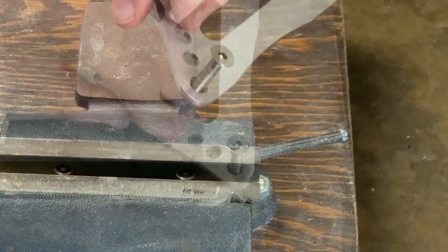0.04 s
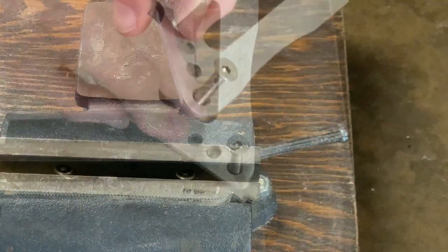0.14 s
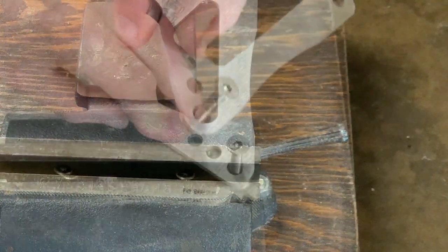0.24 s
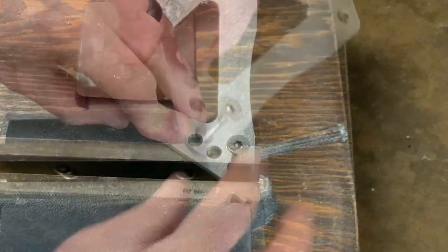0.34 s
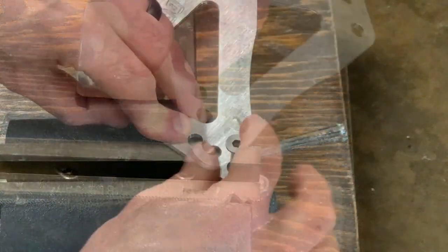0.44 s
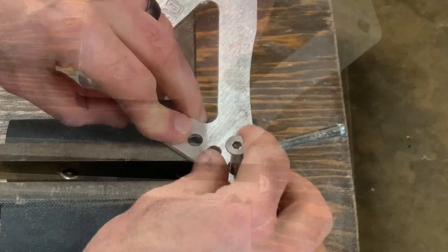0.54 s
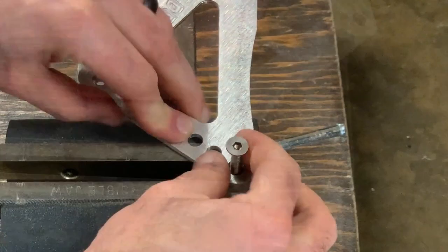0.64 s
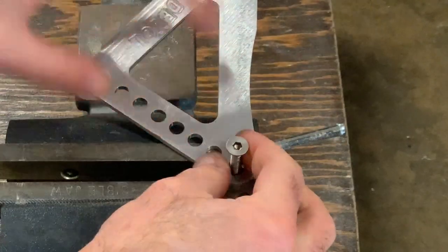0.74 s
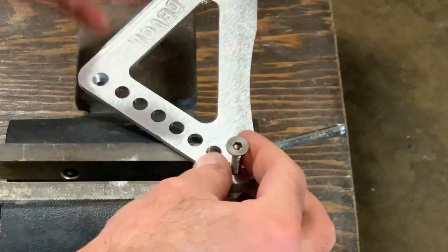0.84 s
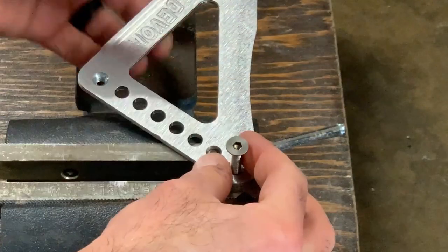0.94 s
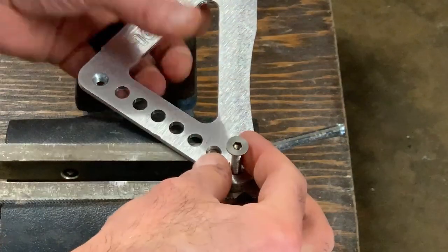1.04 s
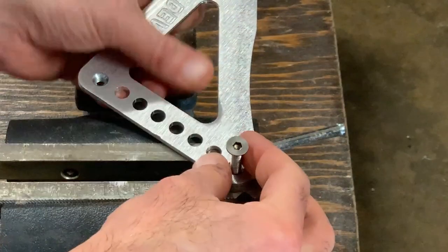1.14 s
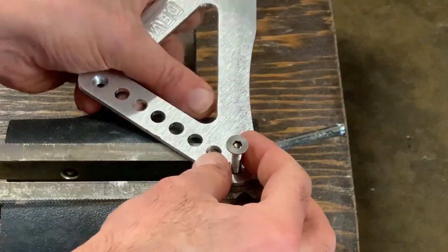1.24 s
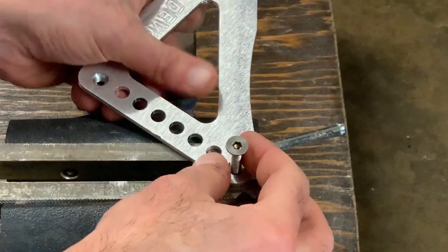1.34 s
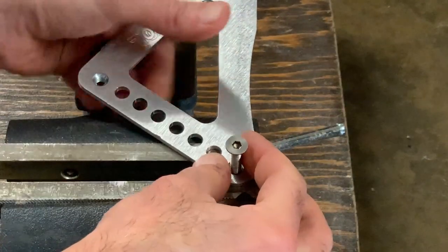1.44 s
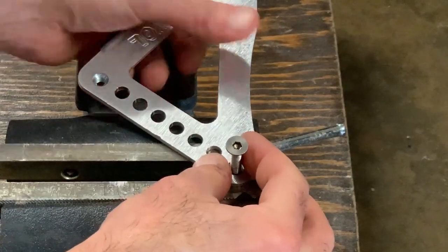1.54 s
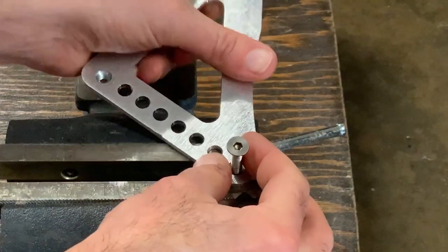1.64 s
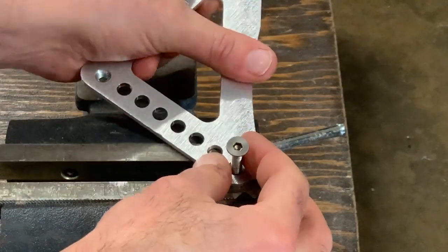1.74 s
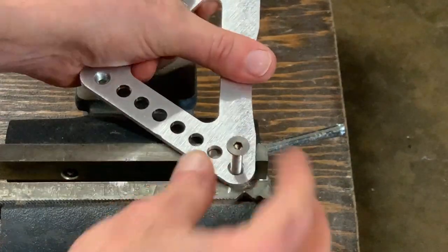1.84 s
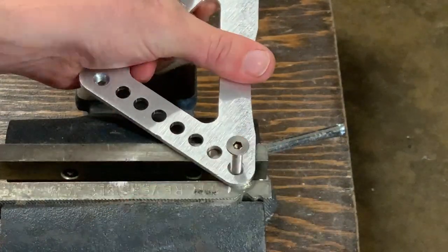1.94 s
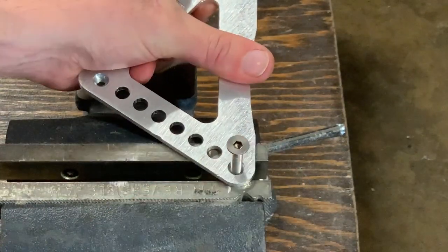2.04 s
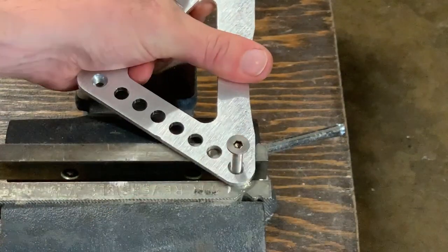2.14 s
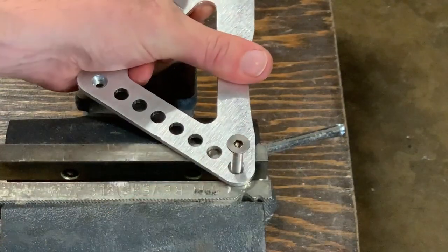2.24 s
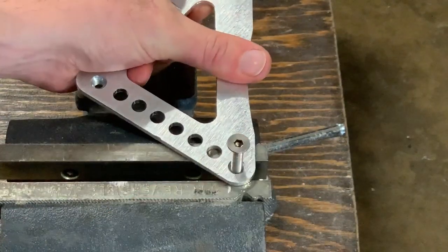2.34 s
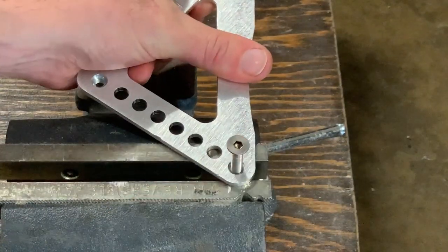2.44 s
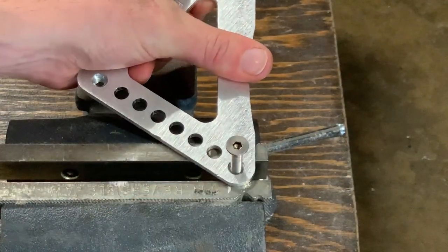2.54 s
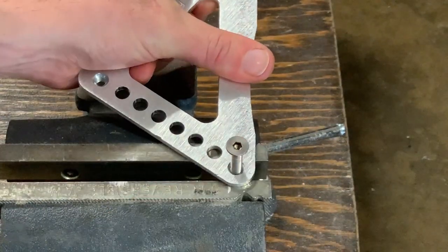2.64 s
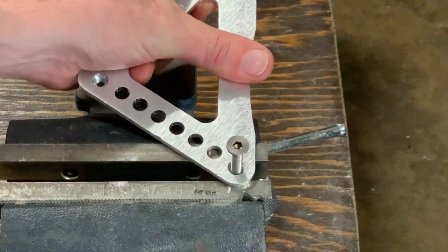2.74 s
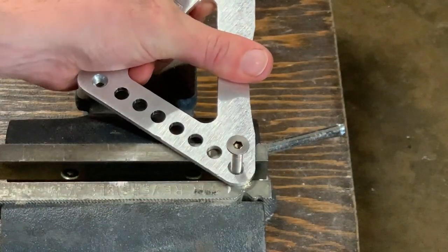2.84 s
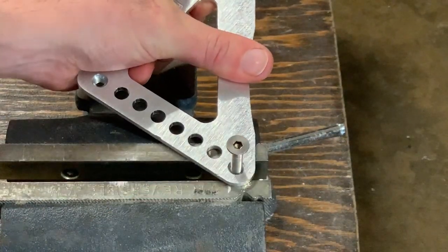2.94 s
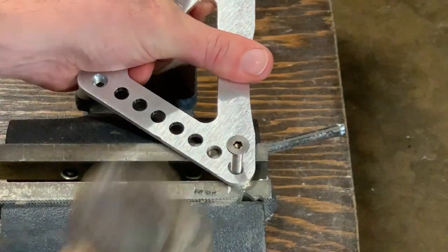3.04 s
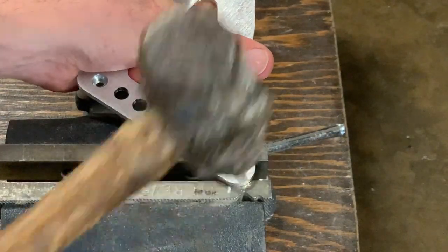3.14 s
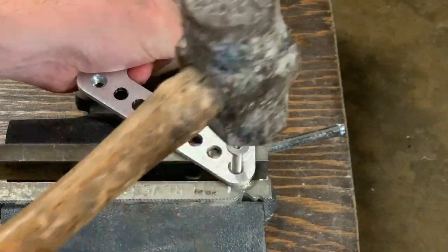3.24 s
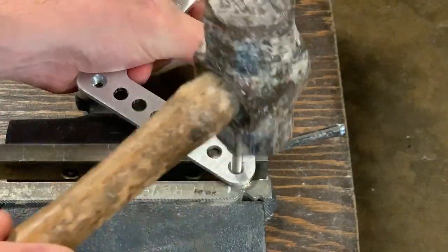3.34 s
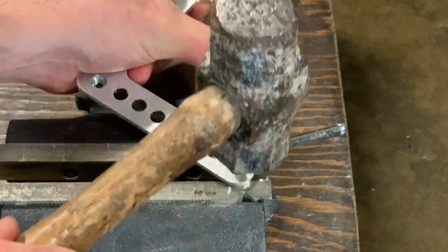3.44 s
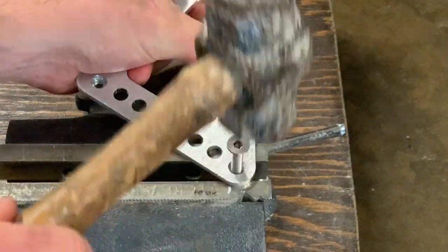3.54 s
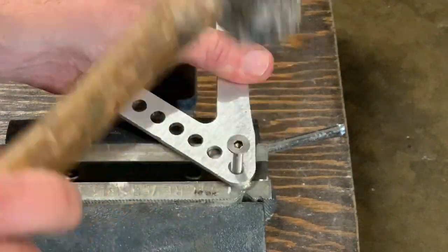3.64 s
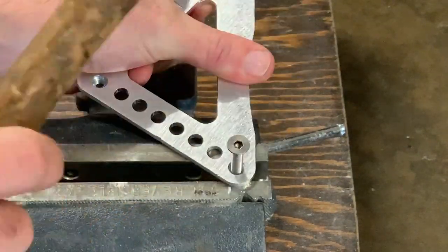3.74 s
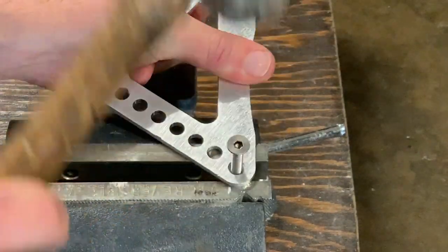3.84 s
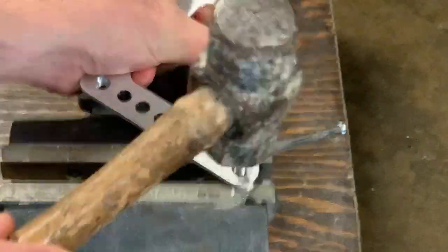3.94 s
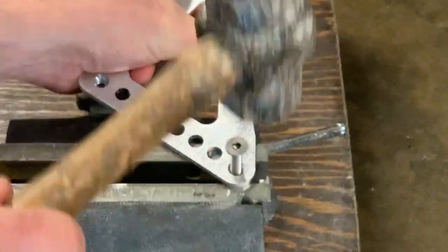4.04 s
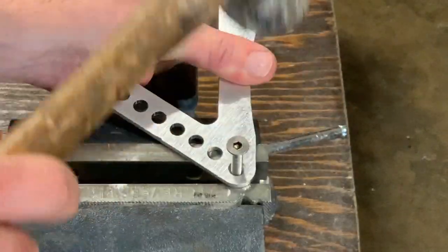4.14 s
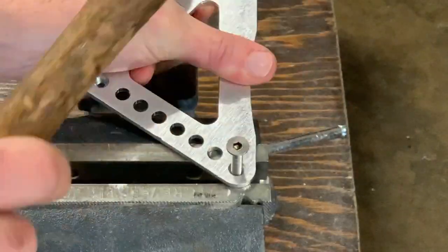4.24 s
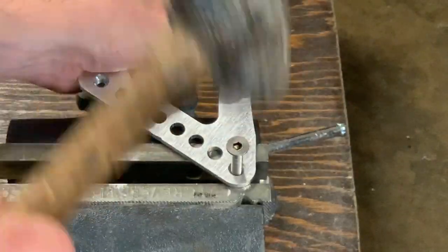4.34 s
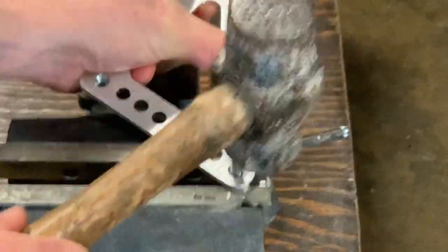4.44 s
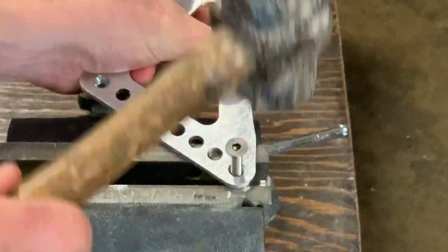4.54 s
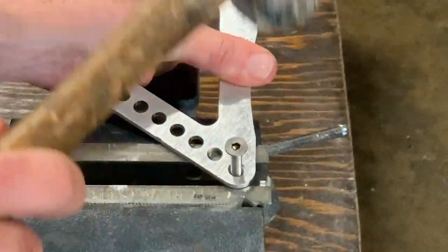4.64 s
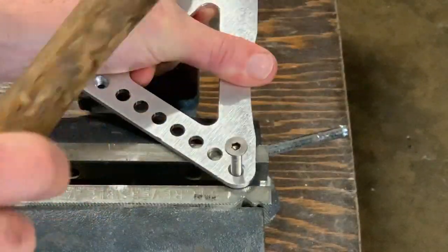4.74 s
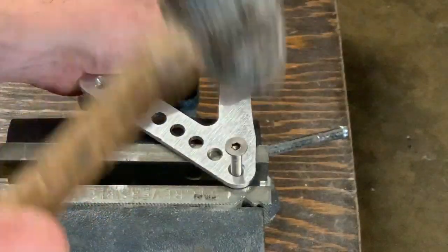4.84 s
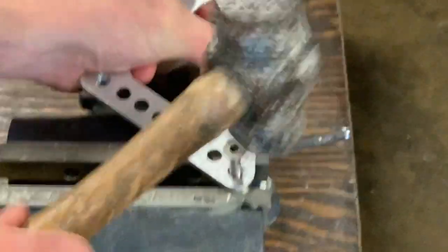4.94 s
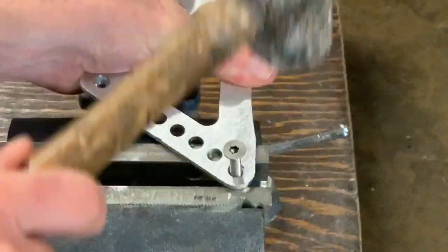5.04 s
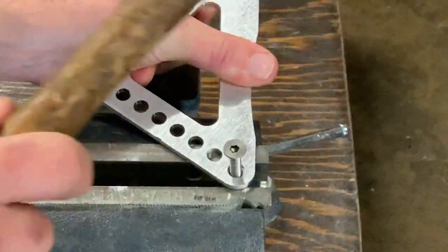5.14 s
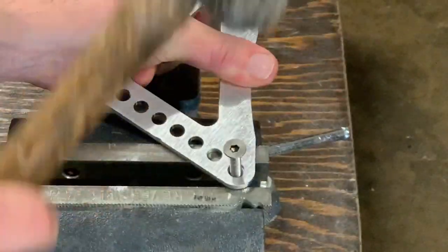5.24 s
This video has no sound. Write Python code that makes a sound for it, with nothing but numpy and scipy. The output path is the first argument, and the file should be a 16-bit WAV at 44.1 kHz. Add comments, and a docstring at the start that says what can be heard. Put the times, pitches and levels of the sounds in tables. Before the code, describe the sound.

Faint metallic clicks and dull wooden knocks in a quiet small workshop, then a light hammer tap and three hard, ringing steel blows.

```python
"""At a workbench in a small, faintly humming workshop, a metal bracket settles on a vise with faint clicks.
A hammer is picked up with dull knocks; one trial tap and three hard blows drive a steel bolt into the bracket.
Each contact is a burst of coloured noise plus decaying modes, low-passed by its hardness, with a diffuse tail.
Under them lie noise floor, hum, an opening hiss, scuffs and thin tones; hard blows overload the microphone."""
import sys
import numpy as np
from scipy import signal
from scipy.fft import rfft, irfft, next_fast_len
from scipy.io import wavfile
from scipy.ndimage import map_coordinates

SR = 44100
rng = np.random.default_rng(int(sys.argv[2]) if len(sys.argv) > 2 else 0)


def inscribe(sig):
    """Save sig as 16-bit PCM at rate SR to the path in sys.argv[1].

    A 1-D sig is mono; a 2-D sig holds one channel per row.
    Samples are clipped to [-1, 1] before scaling.
    """
    pcm = np.round(np.clip(np.atleast_2d(sig).T, -1, 1) * 32767)
    wavfile.write(sys.argv[1], SR, pcm.astype(np.int16))


N = 233015
T = np.arange(int(0.55 * SR)) / SR  # time axis of one contact, s


def amp(db):
    """Decibels to gain."""
    return 10 ** (np.asarray(db) / 20)


def unit(x):
    """Scale to rms 1."""
    return x / np.sqrt(np.mean(x ** 2) + 1e-20)


def along(points, hz):
    """Read (Hz, value) points on a log frequency axis."""
    point_hz, value = np.transpose(points)
    return np.interp(np.log(hz + 1), np.log(point_hz), value)


def fade(t60_s, t=T):
    """Free exponential decay, 60 dB in t60_s."""
    return np.exp(-np.log(1000) * t / t60_s)


def wobble(knots_per_s):
    """A smooth random curve through normally distributed knots."""
    knots = rng.standard_normal(int(N * knots_per_s / SR) + 4)
    return map_coordinates(knots, [np.arange(N) * knots_per_s / SR])


def hold(start_s, attack_s, end_s, release_s):
    """An envelope that rises linearly, holds at 1 and falls silent at end_s."""
    t = np.arange(N) / SR
    rise = np.clip((t - start_s) / attack_s, 0, 1)
    return rise * np.clip((end_s - t) / release_s, 0, 1)


def filtered(x, response):
    """Multiply the spectrum of x by a response of frequency."""
    n = x.shape[-1]
    padded = next_fast_len(n + 8192)
    spectrum = rfft(x, padded) * response(np.fft.rfftfreq(padded, 1 / SR))
    return irfft(spectrum, padded)[..., :n]


def noise(spectrum, side_db, size):
    """Coloured stereo noise of rms 1; side_db sets the stereo difference against the sum."""
    white = rng.standard_normal((2, size))
    mid, side = filtered(white, lambda hz: amp(along(spectrum, hz)))
    side = amp(side_db) * side
    return unit(np.array([mid + side, mid - side]))


def ring(modes, scatter_db, spread_rad, beat_rad=0.76):
    """Decaying modes at new strengths; phases drift in time and differ at the two microphones."""
    out = np.zeros((2, len(T)))
    for hz, db, t60_s in modes:
        drift = map_coordinates(rng.standard_normal(64), [T * 45], order=1)
        start_phase = 2 * np.pi * rng.random() + spread_rad * rng.standard_normal((2, 1))
        level = amp(db + scatter_db * rng.standard_normal())
        out += level * fade(t60_s) * np.sin(2 * np.pi * hz * T + start_phase + beat_rad * drift)
    return out


def soften(x, cutoff_hz):
    """Low-pass: a longer contact excites less treble."""
    b, a = signal.butter(2, min(cutoff_hz, 0.45 * SR), fs=SR)
    return signal.lfilter(b, a, x)


# Room decay. Each row: frequency in Hz, t60 in s.
ROOM_DECAY = [(100, .5), (260, .43), (700, .4), (1800, .39), (4800, .39), (8000, .35), (11000, .31),
              (15000, .24)]
# Tail colour. Each row: frequency in Hz, relative level in dB.
ROOM_COLOUR = [(100, 1), (400, 0.5), (1000, -2), (2500, -0.5), (6000, -5.5), (10000, -2.5), (12500, -13),
               (15000, -7)]


def in_room(x, wet_db, build_s=0.0048):
    """Direct sound plus a diffuse tail of decaying noise, unrelated at the two microphones."""
    hz, t, z = signal.stft(rng.standard_normal((2, len(T))), SR, nperseg=256)
    t60_s = along(ROOM_DECAY, hz)[:, None]
    colour = amp(along(ROOM_COLOUR, hz))[:, None]
    tail = signal.istft(z * fade(t60_s, t) * colour, SR, nperseg=256)[1][:, :len(T)]
    tail = tail * (1 - np.exp(-(T / build_s) ** 2))
    tail = tail / np.linalg.norm(tail[0])
    return x + amp(wet_db) * signal.fftconvolve(x, tail, axes=1)[:, :len(T)]


def add(track, start_s, x):
    """Mix x into the track from start_s."""
    part = track[:, round(start_s * SR):][:, :x.shape[-1]]
    part += x[:, :part.shape[1]]


# Room tone spectrum. Each row: frequency in Hz, relative density in dB per Hz.
ROOM_TONE = [(20, -40.5), (40, -24.5), (60, -10.5), (90, -1.5), (120, -3.5), (155, -13), (200, -12),
             (320, -16.5), (450, -21), (800, -28.5), (2000, -33.5), (5000, -37), (15000, -46)]
# Soft hiss spectrum, also used by the rustle. Each row: frequency in Hz, relative density in dB per Hz.
SOFT_HISS = [(200, 3.5), (700, -4.5), (1300, -9.5), (1550, -6), (1850, 2.5), (2200, -6), (3500, -3),
             (5000, -13.5), (7500, -16.5), (15000, -27)]
ROOM_TONE_DB = -58.5
HUM_HZ, HUM_DB, HUM_ATTACK_S, HUM_END_S, HUM_FADE_S = 94, -53.5, 0.51, 3.5, 0.81
HISS_DB, HISS_END_S, HISS_FADE_S = -50, 0.32, 0.058


def workshop():
    """Steady noise floor, a wavering low sine that swells and dies away, and a soft hiss that soon stops."""
    hum_hz = HUM_HZ + 1.6 * wobble(2.39)
    phase = 2 * np.pi * np.cumsum(hum_hz) / SR + np.array([[0.6], [-0.6]])
    hum = amp(HUM_DB + 2.7 * wobble(3.17)) * np.sin(phase)
    hum = hum * hold(0, HUM_ATTACK_S, HUM_END_S, HUM_FADE_S)
    hiss_level = amp(HISS_DB + 1.1 * wobble(66)) * hold(0, 0.0015, HISS_END_S, HISS_FADE_S)
    hiss = hiss_level * noise(SOFT_HISS, side_db=8.0, size=N)
    tone = amp(ROOM_TONE_DB) * noise(ROOM_TONE, side_db=-1, size=N)
    return (tone + hum + hiss) * amp([[0.6], [-0.6]])


# Thin tones. Each row: start in s, end in s, start pitch in Hz, sag in Hz per s, level in dB.
THIN_TONES = [(0.24, 1.19, 4020, 160, -74.5), (1.96, 2.703, 3410, 20, -81)]
TONE_FADE_S = 0.45


def thin_tones():
    """Faint sines start at once, flutter in pitch and level, sag and die away."""
    out = np.zeros((2, N))
    for start_s, end_s, start_hz, sag_hz_per_s, db in THIN_TONES:
        hz = start_hz - sag_hz_per_s * (np.arange(N) / SR - start_s) + 8 * wobble(19.8)
        level = amp(db + 4.7 * wobble(30.7)) * hold(start_s, 0.01, end_s, TONE_FADE_S)
        out += level * np.sin(2 * np.pi * np.cumsum(hz) / SR + rng.random((2, 1)))
    return out


# Hands and metal scuff softly. Each row: start in s, length in s, level before the window in dB, resonance in Hz.
SOFT_SCUFFS = [(0.712, 0.11, -63, 4660), (0.99, 0.14, -68.5, 11000), (1.892, 0.16, -66, 4180),
               (2.53, 0.15, -65.5, 3000), (2.788, .21, -69.5, 6900), (3.0, 0.16, -70, 4100)]
SCUFF_WIDTH = 0.23  # resonance bandwidth over its centre
RUSTLE_DB, RUSTLE_END_S, RUSTLE_FADE_S = -73, 3.27, 0.25  # until the hammer is raised


def scuffs():
    """Short grainy slides, each noise through one resonance, over a faint uneven rustle of the hands."""
    rustle_level = amp(RUSTLE_DB + 4.5 * wobble(5.9)) * hold(0, 0.25, RUSTLE_END_S, RUSTLE_FADE_S)
    out = rustle_level * noise(SOFT_HISS, side_db=10, size=N)
    for start_s, length_s, db, hz in SOFT_SCUFFS:
        size = int(length_s * SR)
        width_hz = SCUFF_WIDTH * hz
        grains = rng.standard_normal((2, size)) * amp(2.1 * wobble(117)[:size])
        slide = filtered(grains, lambda f: 1j * f * width_hz / (hz * hz - f * f + 1j * f * width_hz))
        add(out, start_s, amp(db) * unit(slide) * np.hanning(size))
    return out


# Bracket touches vise. Each row: start in s, relative level in dB, low-pass in Hz, relative ring in dB.
BRACKET_CLICKS = [(0.524, -40, 14000, 0.5), (.752, -57, 12000, 4.5), (.775, -58.5, 12000, 5.5),
                  (1.013, -61.5, 15000, 4.5), (1.2546, -47, 14000, -3.5), (1.399, -39, 5570, -7.5),
                  (1.68, -52.5, 1500, -10), (1.7407, -42.5, 4700, -11), (1.7794, -44, 1680, 0.5),
                  (1.89, -44.5, 7000, -27), (1.904, -52, 7000, -22), (1.9194, -44, 9000, -26),
                  (2.382, -54.5, 5040, -7)]
# Hand-held bracket modes. Each row: frequency in Hz, relative level in dB, t60 in s.
BRACKET_MODES = [(757, -3.5, 0.13), (1110, 6.5, 0.053), (1392, 5.5, 0.068), (1780, -13.5, 0.33),
                 (2348, 3, 0.067), (3386, -8.5, 0.091), (4670, -6.5, 0.1), (7340, -10.5, 0.14),
                 (9290, -11, 0.15), (10400, -18, 0.23), (11490, -12, 0.17)]
# Tick spectrum. Each row: frequency in Hz, relative density in dB per Hz.
TICK_SPECTRUM = [(300, -0.5), (650, 5.5), (1200, -0.5), (2500, 0.5), (4500, 0.5), (8000, -4), (15000, 0.5)]


def bracket():
    """Light contacts tick and ring the bracket, damped by the hand."""
    out = np.zeros((2, N))
    for start_s, db, bright_hz, ring_db in BRACKET_CLICKS:
        tick = noise(TICK_SPECTRUM, side_db=-5.5, size=len(T)) * fade(0.038)
        ringing = amp(ring_db - 11.5) * ring(BRACKET_MODES, scatter_db=6.5, spread_rad=0.62)
        click = soften(tick + ringing, bright_hz)
        add(out, start_s, in_room(amp(db) * click, wet_db=-6.5))
    return out * amp([[0.7], [-0.7]])


# Lifted hammer knocks on bench. Each row: start in s, relative level in dB, low-pass in Hz, relative ping in dB.
BENCH_KNOCKS = [(2.6556, -40.5, 1620, 1), (2.7116, -30, 3470, -1), (2.7334, -39, 3000, -8)]
# Wooden knock spectrum. Each row: frequency in Hz, relative density in dB per Hz.
WOOD_SPECTRUM = [(80, -21), (200, 2), (380, 3), (700, 0.5), (1050, 3), (1600, -2), (2250, 3.5), (2800, -6),
                 (4000, -16), (7000, -34), (15000, -36)]
# Hammer head modes. Each row: frequency in Hz, relative level in dB, t60 in s.
HEAD_MODES = [(1014, -0.5, 0.061), (2340, 0.5, 0.041)]


def pickup():
    """Dull wooden knocks of fast-decaying noise with a short ping of the head, slightly to the left."""
    out = np.zeros((2, N))
    for start_s, db, bright_hz, ping_db in BENCH_KNOCKS:
        ping = amp(ping_db - 9.5) * ring(HEAD_MODES, scatter_db=1, spread_rad=0.4, beat_rad=0.3)
        wood = noise(WOOD_SPECTRUM, side_db=-2.5, size=len(T)) * fade(0.017)
        knock = soften(wood + ping, bright_hz)
        add(out, start_s, in_room(amp(db + 11) * knock, wet_db=-7.5, build_s=0.0026))
    return out * amp([[1], [-1]])


# Blows and rebounds. Each row: start in s, then relative force, contact crack and bolt ring in dB.
HAMMER_BLOWS = [(3.5047, -21.5, -18.5, -18), (3.519, -19, -33, -28.5), (4.0082, -4.5, -6, -30),
                (4.043, -15.5, -35.5, -39.5), (4.468, -3.5, -6, -31.5), (4.972, -4, -4.5, -6.5)]
# Bracket and vise modes. Each row: frequency in Hz, relative level in dB, t60 in s.
STEEL_MODES = [(409, -18, .3), (608, -12, .16), (650, -9, .2), (694, -9, .28), (730, -10, .18),
               (771, -9, .2), (951, -4, .18), (976, -3, .29), (1000, -5, .1), (1041, -5.5, .16),
               (1075, -7, .16), (1172, -10, .2), (1233, -11, .2), (1304, -12, .3), (1384, -16, .28),
               (1755, -12, .12), (1788, -12, .24), (2620, -8, .09), (2652, -10, .24), (3262, -20, .36),
               (3860, -19, .24), (4330, -23, .24), (5487, -20, .33), (8505, -23, .33)]
# Modes of the bolt chattering in its hole. Each row: frequency in Hz, relative level in dB, t60 in s.
BOLT_MODES = [(2440, -16, .12), (3516, -11.5, 0.3), (4130, -7.5, 0.14), (4470, -3.5, 0.14),
              (5300, -4.5, 0.066), (5540, -2, 0.17), (5930, -4, 0.11), (7050, -3, 0.097),
              (7800, -13.5, 0.1), (8200, -13.5, 0.073)]
# Bench thud spectrum. Each row: frequency in Hz, relative density in dB per Hz.
THUD_SPECTRUM = [(40, -42.5), (105, -7), (160, -19), (260, -12), (480, -8), (680, 0.5), (880, -1),
                 (1050, -0.5), (1550, -8.5), (1850, -5), (2400, -14), (2650, -9), (2950, -18.5),
                 (15000, -39)]
# Steel contact spectrum. Each row: frequency in Hz, relative density in dB per Hz.
CRACK_SPECTRUM = [(300, -27), (1500, -10), (2500, -2), (4200, 3), (6300, -4), (9800, -4.5), (10900, -4),
                  (12200, 0), (13200, -1.5), (15800, -14.5)]
RING_DB, RING_DB_PER_FORCE_DB = -1, 1.85  # steel ring at 0 dB force, and its growth
CONTACT_HZ, CRACK_DB_PER_OCTAVE = 17500, 13.5  # a sharper crack is a shorter, brighter contact


def hammer():
    """Steel cracks on steel; vise and bench swell a moment later, the ring growing faster than the force."""
    out = np.zeros((2, N))
    for start_s, force_db, crack_db, bolt_db in HAMMER_BLOWS:
        bright_hz = CONTACT_HZ * 2 ** (crack_db / CRACK_DB_PER_OCTAVE)
        crack_decay = fade(0.019) + amp(-22.0) * fade(0.028)
        crack = amp(crack_db + 5.5) * noise(CRACK_SPECTRUM, side_db=-2, size=len(T)) * crack_decay

        swell = 1 - np.exp(-(T / 0.0017) ** 2)
        thud_decay = fade(0.037) + amp(-16.0) * fade(0.17)
        thud = amp(force_db + 7.0) * noise(THUD_SPECTRUM, side_db=-13, size=len(T)) * swell * thud_decay

        steel_level = amp(RING_DB + RING_DB_PER_FORCE_DB * force_db)
        steel = steel_level * swell * ring(STEEL_MODES, scatter_db=1.67, spread_rad=0.26, beat_rad=0.77)
        bolt = amp(bolt_db - 9.0) * ring(BOLT_MODES, scatter_db=1.5, spread_rad=1.0, beat_rad=1.0)

        blow = in_room(crack, wet_db=-1.5, build_s=0.0013)
        blow = blow + in_room(thud, wet_db=-6.0, build_s=0.0053)
        blow = blow + in_room(steel + bolt, wet_db=-7.5, build_s=0.016)
        add(out, start_s, soften(blow, bright_hz))
    return out * amp([[0.4], [-0.4]])


def scene():
    """Everything at the workbench."""
    return workshop() + thin_tones() + scuffs() + bracket() + pickup() + hammer()


CEILING, KNEE_HARDNESS = 1.0, 8
LOW_CUT_HZ, TOP_HZ = 45, 15900


def record(dry):
    """The microphone clips on the hard blows, sheds deep bass and cuts steeply above its band limit."""
    clipped = dry / (1 + np.abs(dry / CEILING) ** KNEE_HARDNESS) ** (1 / KNEE_HARDNESS)
    b, a = signal.butter(2, LOW_CUT_HZ, "high", fs=SR)
    lean = signal.lfilter(b, a, clipped)
    return filtered(lean, lambda hz: 1 / (1 + (hz / TOP_HZ) ** 160))


dry = scene()
out = record(dry)
inscribe(out)
```